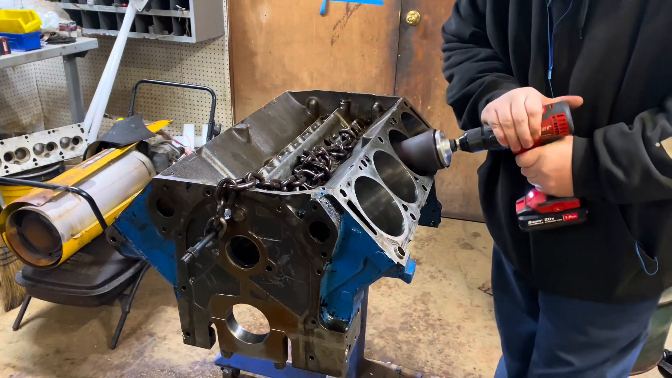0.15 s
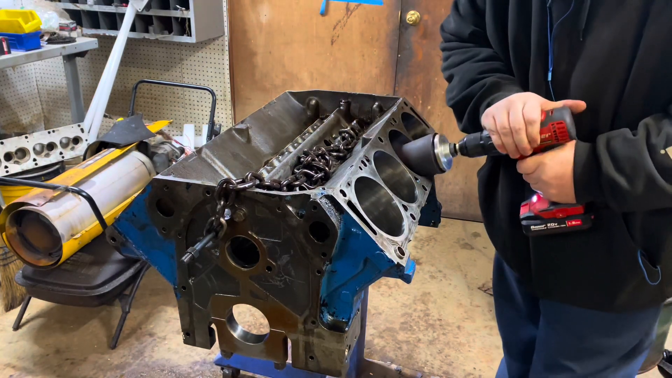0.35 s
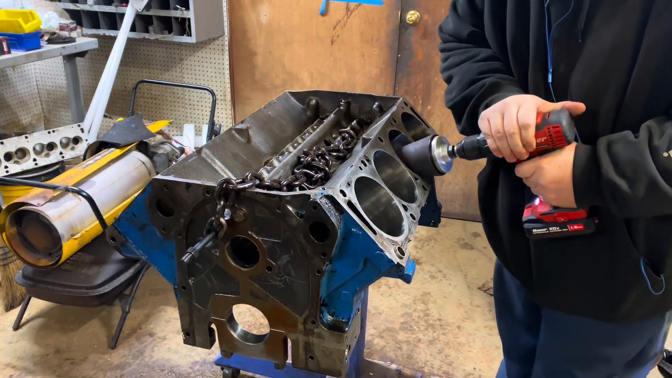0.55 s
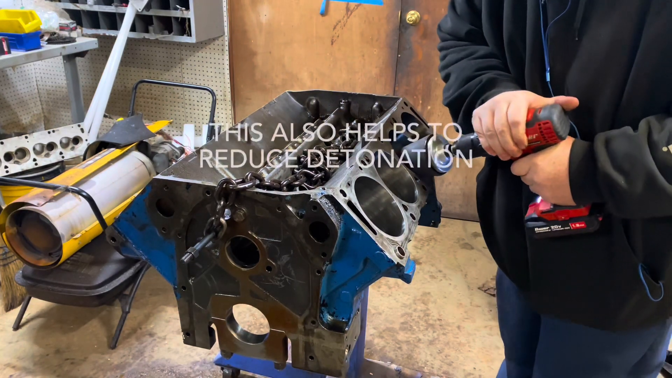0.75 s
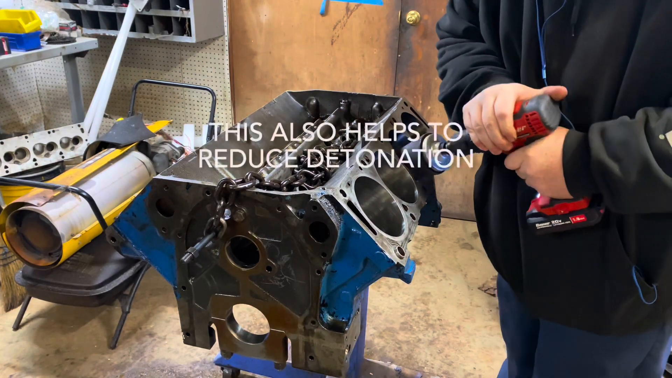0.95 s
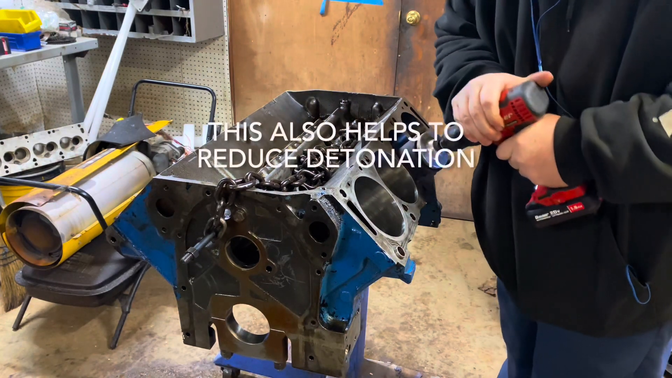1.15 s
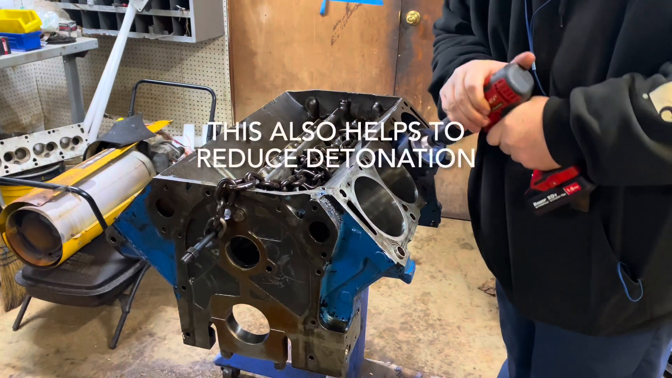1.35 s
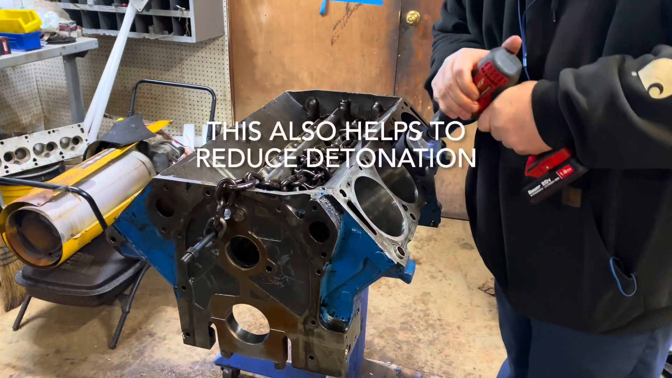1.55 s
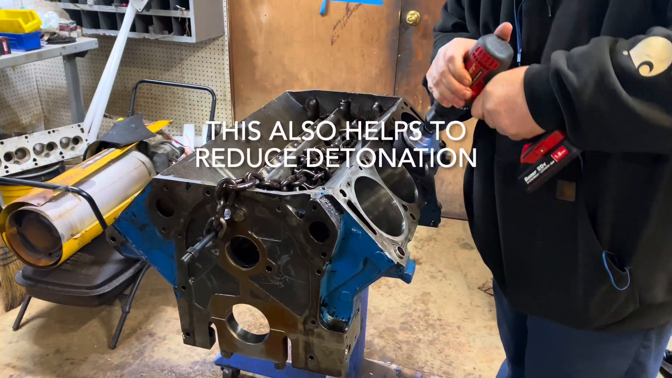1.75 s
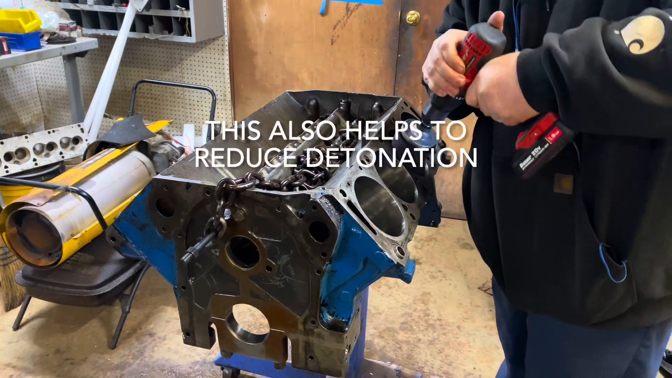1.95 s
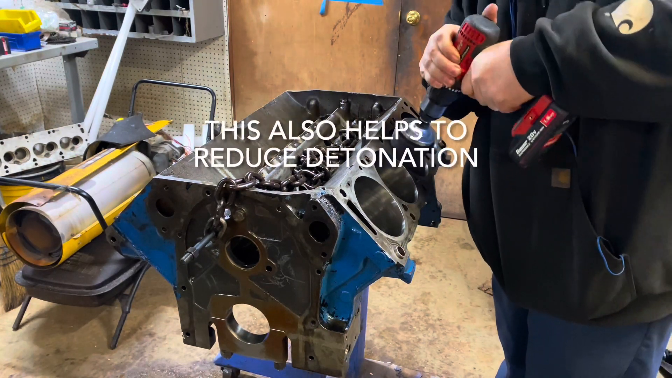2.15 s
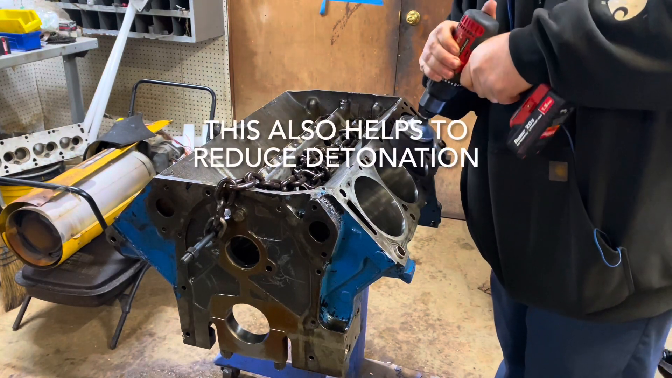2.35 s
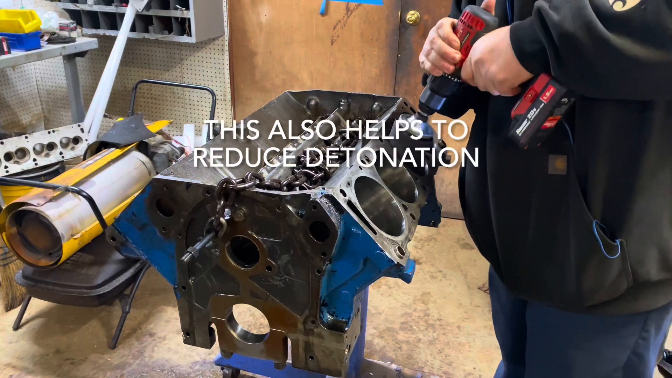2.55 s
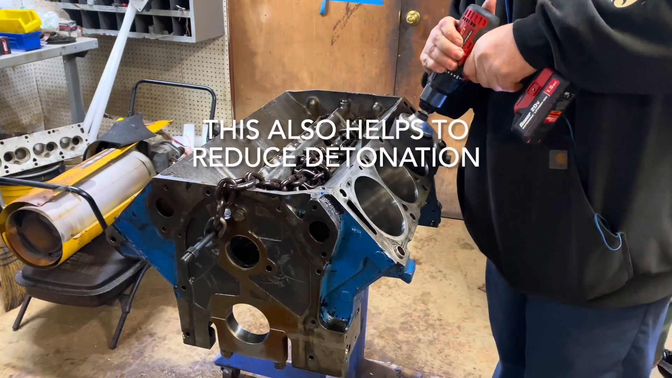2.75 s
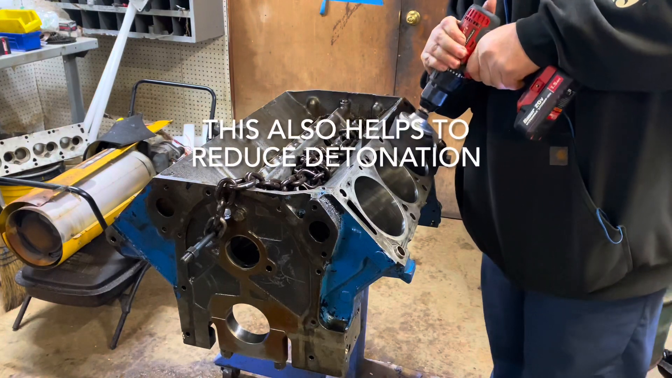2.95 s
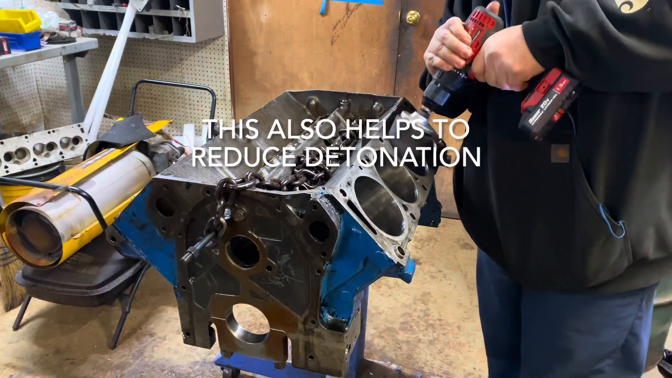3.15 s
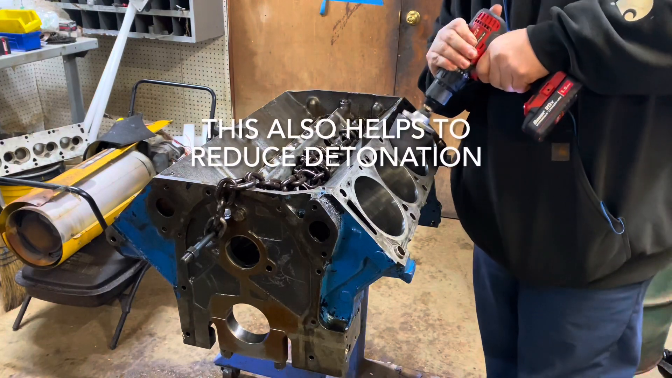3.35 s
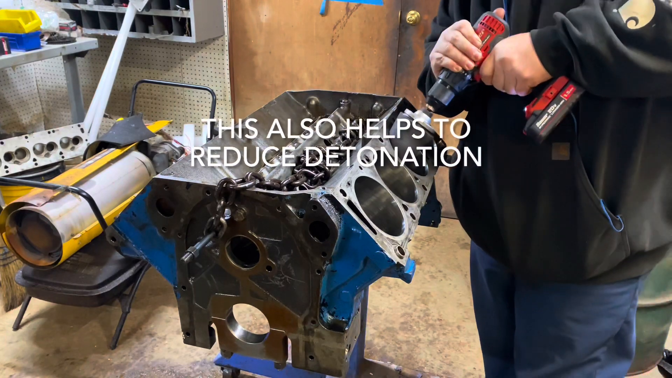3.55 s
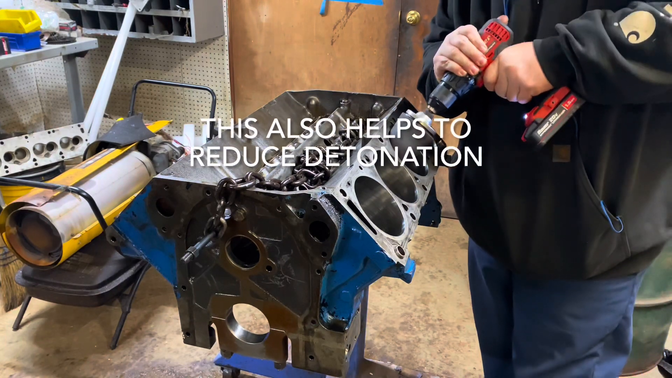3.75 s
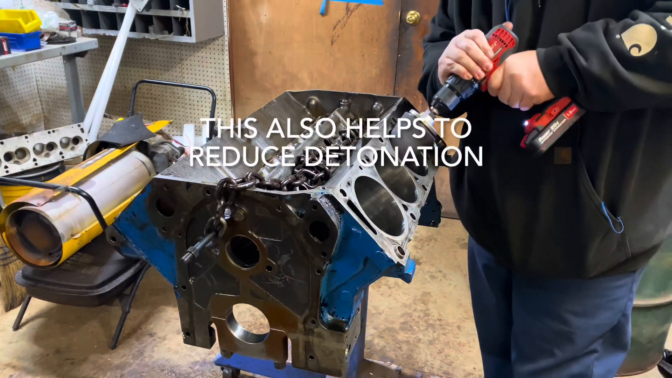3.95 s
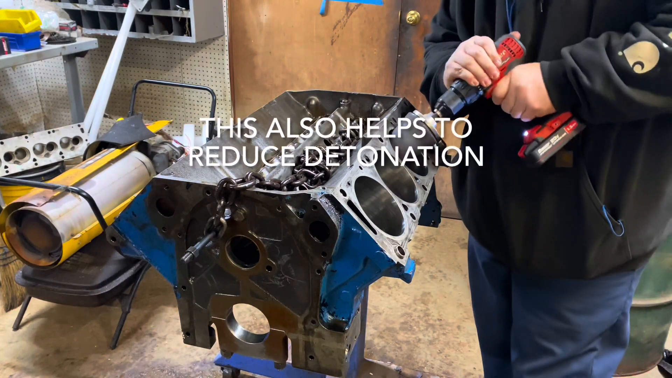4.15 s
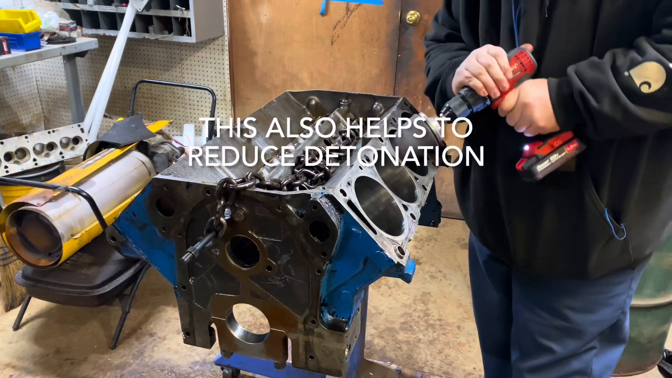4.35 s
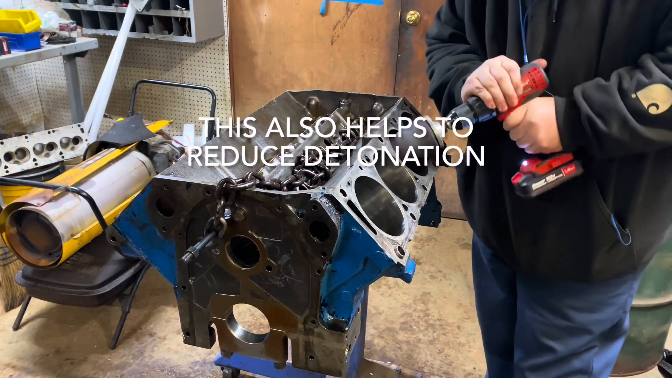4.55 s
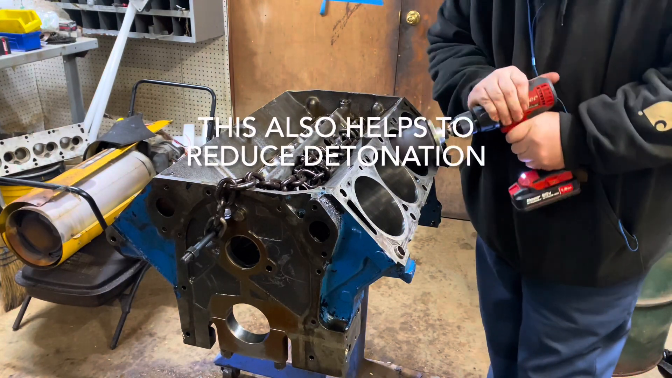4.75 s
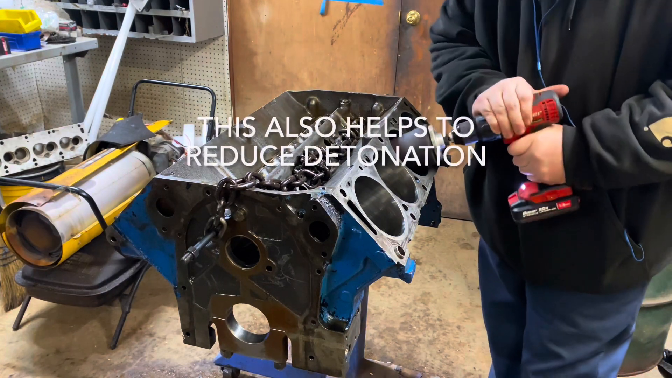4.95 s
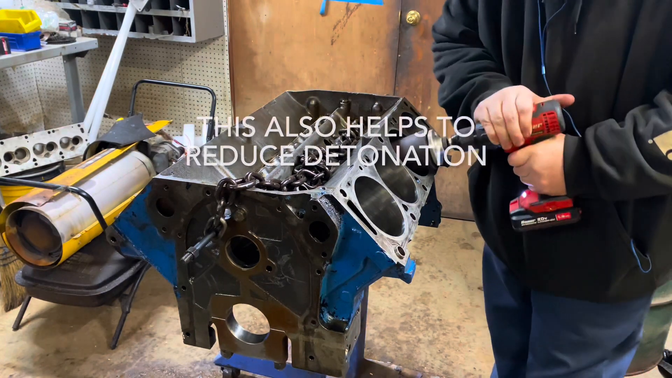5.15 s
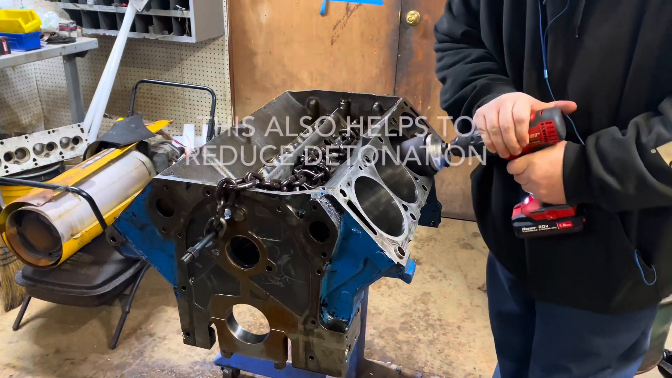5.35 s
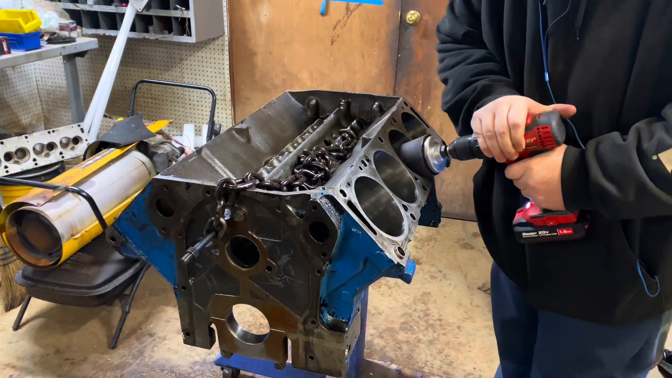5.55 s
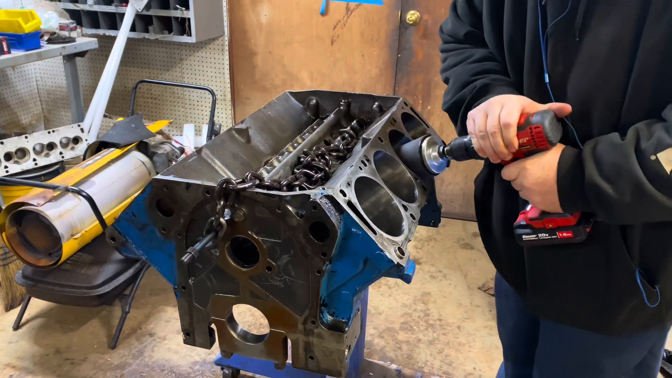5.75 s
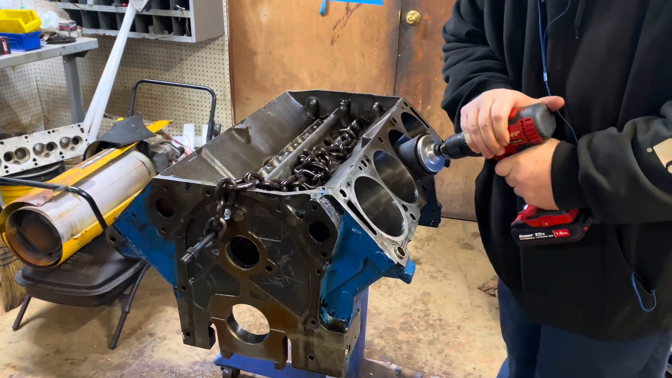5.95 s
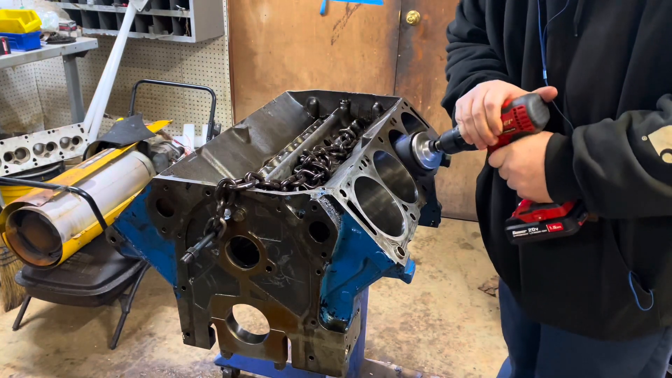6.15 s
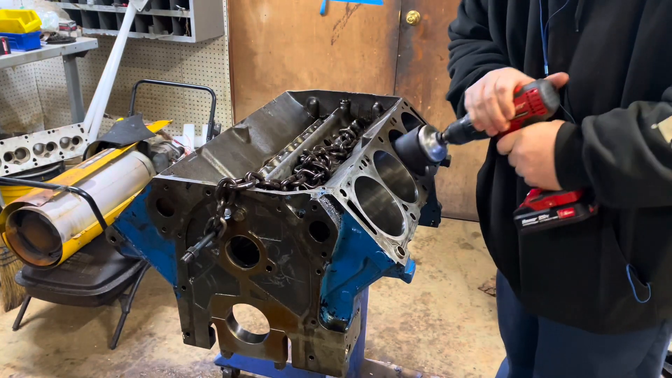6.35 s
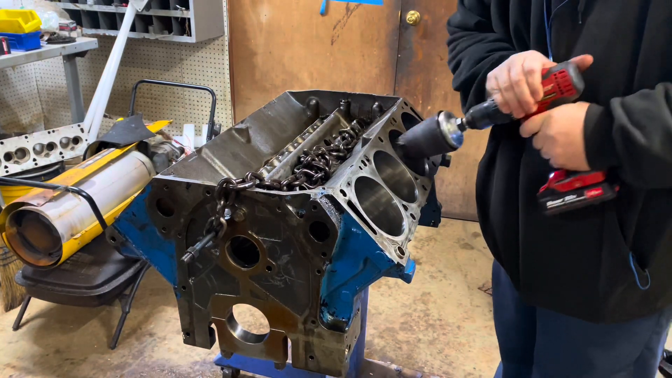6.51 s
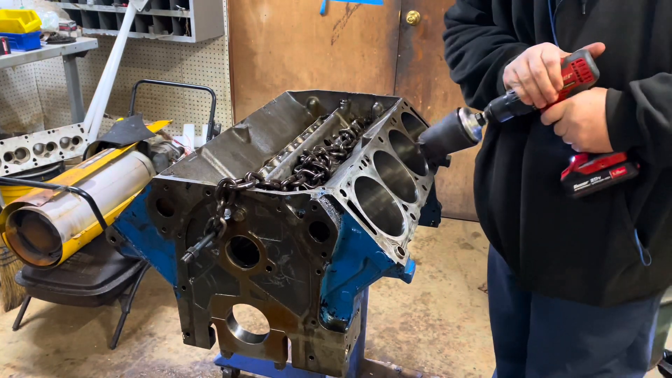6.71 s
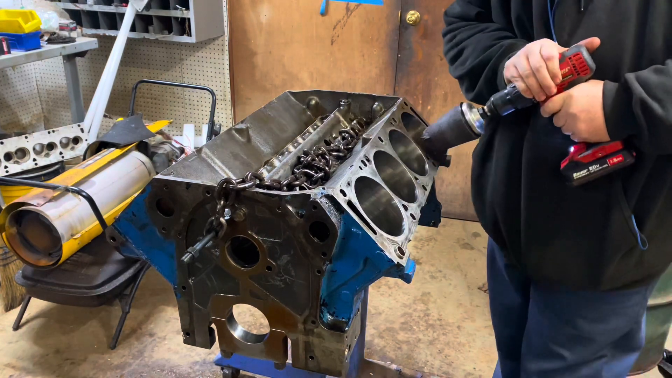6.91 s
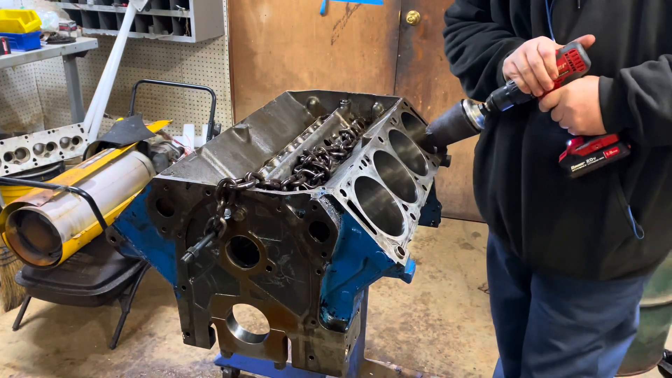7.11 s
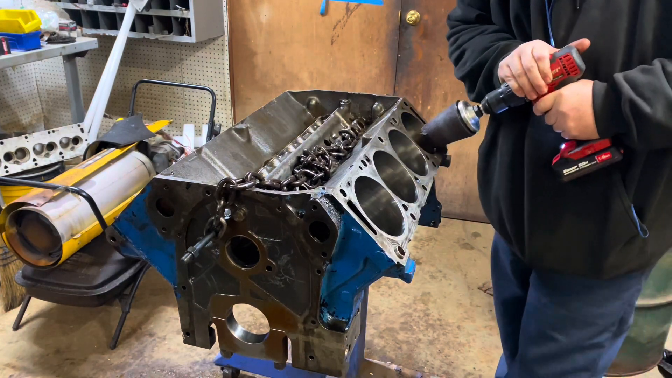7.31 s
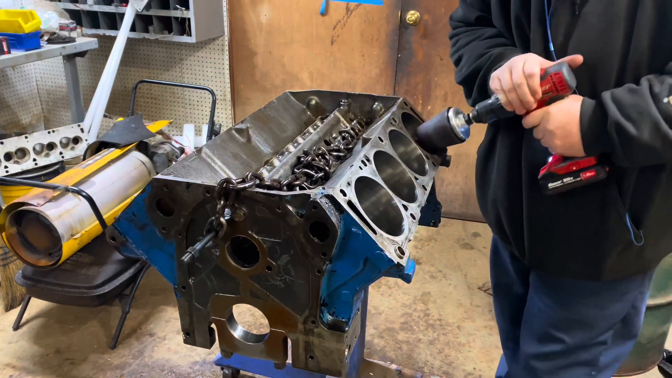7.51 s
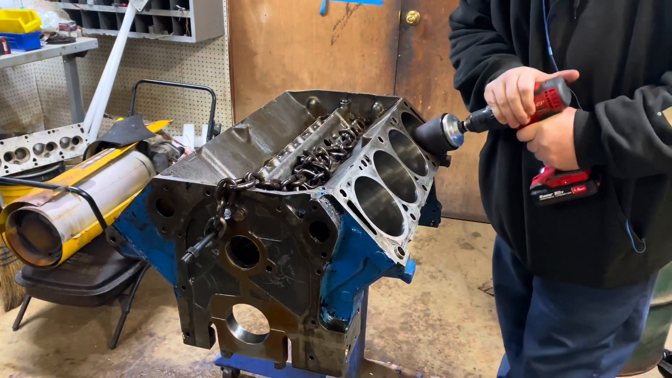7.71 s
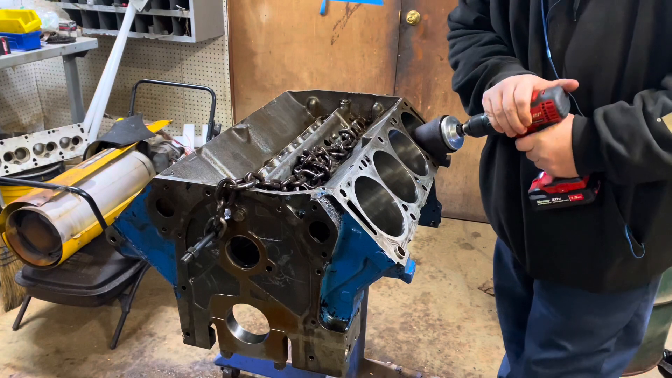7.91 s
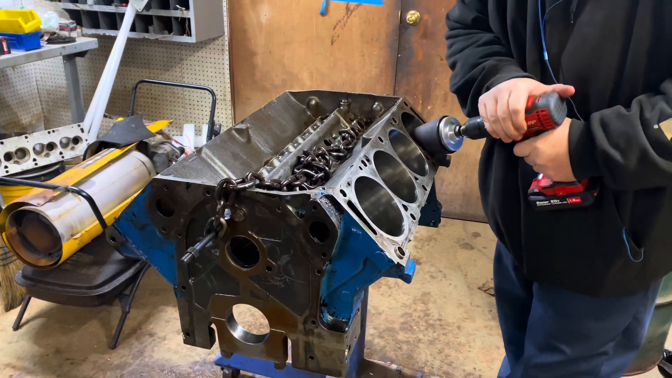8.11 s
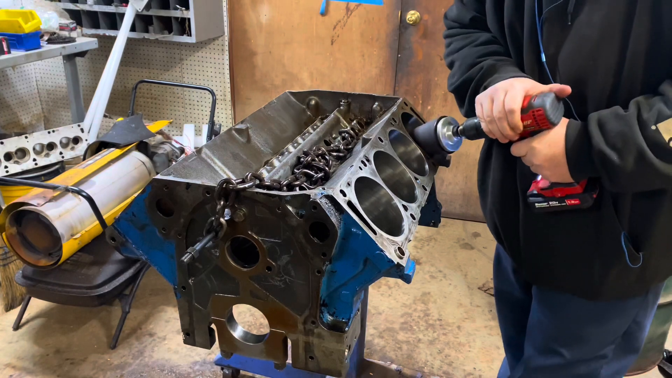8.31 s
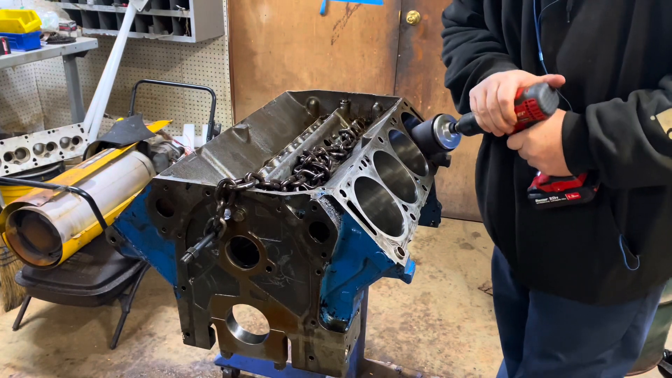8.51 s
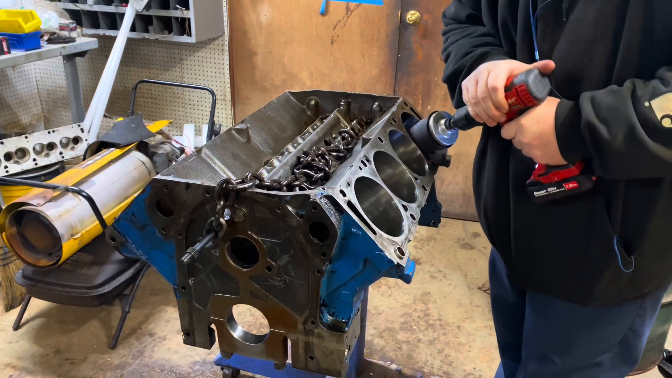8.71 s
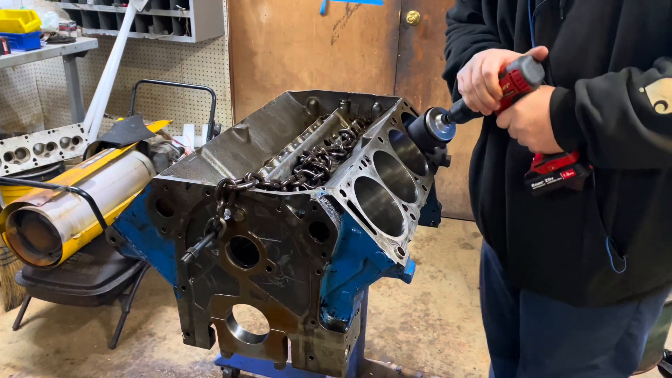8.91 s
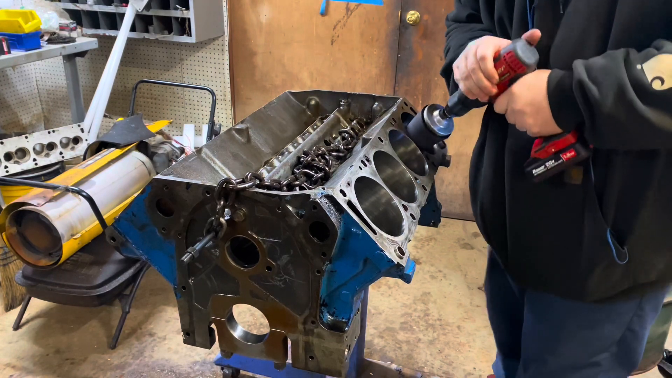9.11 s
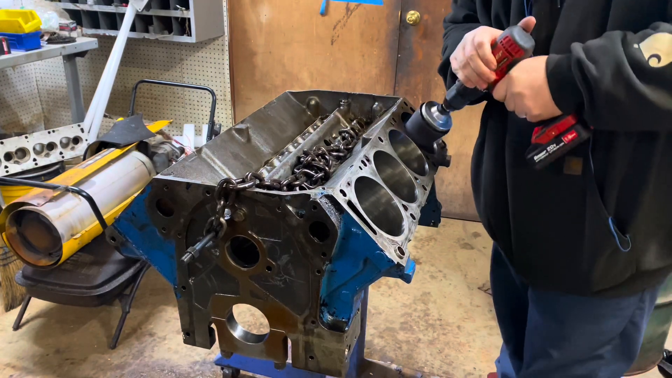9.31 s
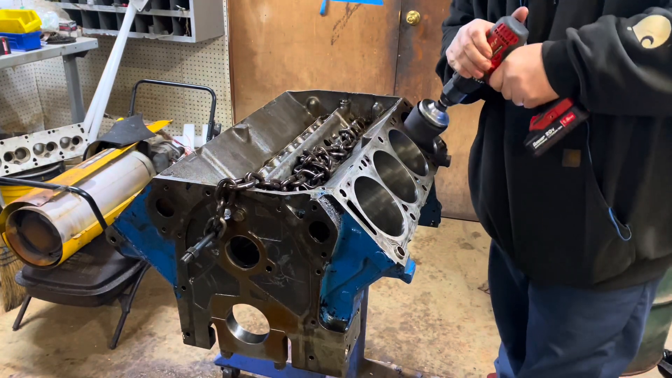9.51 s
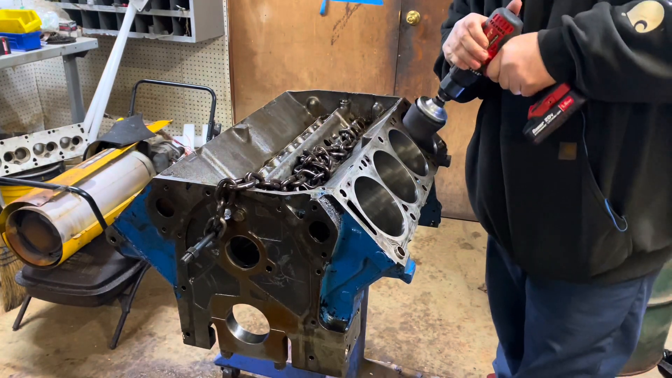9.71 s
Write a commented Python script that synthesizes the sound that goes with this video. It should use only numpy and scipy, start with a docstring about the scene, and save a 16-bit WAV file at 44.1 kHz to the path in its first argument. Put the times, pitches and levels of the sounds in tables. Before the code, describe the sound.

From 0 s a cordless drill is already running at full speed, close in a small workshop. A steady hum around 430 Hz lies under raspy, shifting gear tones, a dense bright mechanical rattle and a very high, thin whine near 7.7 kHz. From about 1 to 5 s the drill is swung up and back: the hum grows stronger while the whine dips, flutters and returns. At 6.25 s the trigger is released; the pitch drops fast and the motor brakes with a short, sharp chirp and clack at 6.3 s, with a brief room tail. Low shop rumble and faint air remain. Between 6.9 and 7.9 s come soft handling knocks, tiny plastic ticks and a rasping sleeve. Around 8 s a faint squeal and firm clack start the motor again, almost instantly at full speed, whirring through the end near 9.9 s, the hum rising as the whine fades.

```python
"""A cordless drill spins a cone-shaped cutter at the cylinder edges of an engine block, in a small workshop.
Its motor hums once a turn and whines at 18 times that; gear meshes add raspy tones and a noisy rattle.
The drill is swung up and back, which turns its tones toward or away from the listener.
It brakes with a chirp, is shifted in the hands with clacks, ticks and a brushing sleeve, and runs up again.
Slowly changing diffuse room tails surround it, over the rumble, hum and faint air of the shop."""
import sys
import numpy as np
from scipy import signal
from scipy.fft import rfft, irfft, next_fast_len
from scipy.io import wavfile
from scipy.ndimage import uniform_filter1d

SR = 44100
rng = np.random.default_rng(int(sys.argv[2]) if len(sys.argv) > 2 else 0)


def master_out(mix):
    """Clip the mix to full scale and print it as 16-bit PCM to the path in sys.argv[1]."""
    frames = np.transpose(np.atleast_2d(mix))
    ceiling = np.clip(frames, -1, 1)
    pcm = np.round(ceiling * 32767).astype(np.int16)
    wavfile.write(sys.argv[1], SR, pcm)


N = 435266
TIME = np.arange(N) / SR
BINS = np.fft.rfftfreq(N, 1 / SR)
WHINE_ORDER = 18  # whine cycles per turn of the shaft

# full speed sags a little as the drill is moved: (time [s], pitch of the whine [Hz])
FULL_SPEED = [(0, 7776), (.85, 7784), (1.4, 7747), (1.85, 7740), (2.0, 7721), (2.35, 7716), (3.1, 7732),
              (3.9, 7739), (4.45, 7717), (4.8, 7758), (5.35, 7765), (5.7, 7750), (6.0, 7725), (6.24, 7782),
              (8.3, 7758), (8.7, 7743), (9.45, 7755), (9.87, 7746)]


def gain_of(db):
    """The decibel law: 20 dB is a tenfold amplitude."""
    return 10 ** (np.asarray(db) / 20)


def evened(x):
    """Normalisation to unit mean power (rms 1)."""
    return x / np.sqrt(np.mean(abs(x) ** 2) + 1e-20)


def read(points, hz, column=1):
    """Interpolation of a spectrum table on a log-frequency axis."""
    table = np.array(points)
    return np.interp(np.log(hz + 1), np.log(table[:, 0] + 1), table[:, column])


def curve(rows, column=1):
    """Linear interpolation of a time table."""
    table = np.array(rows)
    return np.interp(TIME, table[:, 0], table[:, column])


def coloured(x, db):
    """Zero-phase linear filtering by a dB value for each bin; rms 1."""
    return evened(irfft(rfft(x) * gain_of(db), N))


def wander(hz):
    """Low-pass noise as slow chance variation, its spectral amplitude halved at hz; rms 1."""
    size = next_fast_len(N, True)
    low = np.fft.rfftfreq(size, 1 / SR)[:size // 16]
    spectrum = rng.standard_normal(len(low)) + 1j * rng.standard_normal(len(low))
    return evened(irfft(spectrum / (1 + (low / hz) ** 2), size)[:N])


def pair(likeness):
    """Partial coherence: white noise in two channels with a shared part."""
    common = rng.standard_normal(N)
    own = rng.standard_normal((2, N))
    likeness = np.clip(likeness, 0, 1)
    return np.sqrt(likeness) * common + np.sqrt(1 - likeness) * own


def resonances(rows, hz):
    """Superposed resonance peaks of Lorentzian shape, as a lift in dB."""
    return sum(db / (1 + (2 * (hz - centre) / width) ** 2) for centre, width, db in rows)


def motor(pulled, released):
    """Rotor inertia: share of full speed through a quick run-up, a short coast, then the brake."""
    spin_up_s = .043
    coast_per_s, brake_after_s, brake_per_s = 1.42, .087, 10  # shares of full speed lost per second
    run_up = 1 - np.exp(-np.maximum(TIME - pulled, 0) / spin_up_s)
    since = np.maximum(TIME - released, 0)
    slowed = coast_per_s * since + brake_per_s * np.maximum(since - brake_after_s, 0)
    return run_up * np.maximum(1 - slowed, 0)


def meshing(speed):
    """Contact threshold: the gears clatter only above a certain share of full speed."""
    rattle_from, rattle_power = 0.36, 0.44
    return np.clip((speed - rattle_from) / (1 - rattle_from), 0, 1) ** rattle_power


def housing_ring(x):
    """Modal resonance: the housing's low mode swells after the hum passes it and rings on."""
    peak_hz, width_hz, resonant_db = 398, 13, 7.5

    def response(hz):
        return 1 + gain_of(resonant_db) / (1 + 2j * (hz - peak_hz) / width_hz)

    full_speed_gain = abs(response(curve(FULL_SPEED).mean() / WHINE_ORDER))
    return irfft(rfft(x) * response(BINS), N) / full_speed_gain


def hum(turns, speed, tilt, wobble, waver=0.15, wobble_db=-63, second_power=4, tones_db=-2.6,
        fading_db=3.0, fading_hz=2.6, rasp_hz=70):
    """Periodic forcing: rotor unbalance hums purely; bearings and gear meshes add unsteady, raspy tones."""
    # the hum beams at the listener as the drill is swung up: (time [s], level before radiation [dB])
    hum_level = [(0, -39), (.3, -40.5), (.6, -38), (1.0, -33.5), (2, -34.5), (3.1, -34), (3.8, -34),
                 (4.2, -32), (4.6, -34), (5.0, -38), (5.4, -42), (6.2, -40.5), (8.08, -37.5), (8.16, -35),
                 (8.235, -38.5), (8.3, -39), (8.8, -38), (9.3, -36.5), (9.87, -32.5)]
    # the hum shifts between the ears as the drill moves: (time [s], phase lead of left [rad])
    hum_lead = [(0, -1.2), (.4, -.3), (.8, .05), (2, -.1), (3.3, -.5), (4.3, -1.2), (5, -1.3), (5.6, -.35),
                (6.2, -.1), (8.12, -.4), (8.24, -1.5), (8.4, -.7), (9.2, -.4), (9.87, -.6)]
    # second harmonic of the hum: (time [s], level at full speed [dB])
    second_level = [(0, -44.5), (.5, -41), (1, -50), (1.95, -55.5), (3.1, -51), (4, -47), (4.5, -56),
                    (5, -45.5), (5.6, -41), (6.1, -57), (8.3, -41.5), (9.87, -49)]
    # drone of the planet gears below the hum: (time [s], level at full speed [dB])
    drone_level = [(0, -59.5), (.5, -56), (1.1, -68.5), (2.9, -64), (3.3, -59.5), (3.9, -61), (4.2, -56),
                   (4.8, -56.5), (5.35, -55), (5.9, -63.5), (8.3, -57), (9.1, -60), (9.87, -64)]
    # gear tones at the 4th, 5th, 9th, 10th and 15th harmonics: (time [s], level before case lift [dB])
    fourth_level = [(0, -46), (.7, -55), (1.3, -45.5), (1.9, -56), (2.4, -50.5), (4, -51), (4.8, -45.5),
                    (5.5, -48), (6.2, -55), (8.2, -54), (8.5, -45), (8.85, -58), (9.25, -47), (9.87, -49)]
    fifth_level = [(0, -38), (.15, -37.5), (.78, -50.5), (1.1, -42), (1.65, -40), (2.1, -41), (2.8, -50),
                   (3.3, -44.5), (3.65, -40.5), (4.25, -48), (4.63, -39), (5.1, -41.5), (5.35, -46),
                   (5.65, -66), (5.95, -46), (6.2, -44), (8.14, -47), (8.22, -40), (8.35, -40),
                   (8.6, -48.5), (8.95, -40.5), (9.25, -38), (9.55, -43), (9.8, -41.5)]
    ninth_level = [(0, -42), (.45, -50), (1.12, -43.5), (1.6, -48), (2.7, -46), (3.7, -40), (4.3, -46),
                   (4.9, -51), (5.25, -63), (5.7, -39.5), (6.2, -53), (8.2, -49), (8.6, -39), (9, -49),
                   (9.87, -46)]
    tenth_level = [(0, -62), (.42, -49), (.53, -37.5), (.68, -39), (.8, -50), (.95, -40.5), (1.2, -39.5),
                   (1.5, -50.5), (1.8, -37), (2.06, -47), (2.25, -40), (2.7, -43), (3.35, -36.5),
                   (3.65, -40), (4.2, -38), (4.7, -43), (4.97, -59.5), (5.2, -44), (5.6, -47.5),
                   (6.2, -45.5), (8.15, -43), (8.6, -42.5), (8.8, -50), (9.1, -44.5), (9.87, -38)]
    fifteenth_level = [(0, -40), (.4, -41.5), (.8, -44), (1.3, -54), (3.9, -54), (4.5, -48), (4.95, -42.5),
                       (5.5, -44), (6.1, -57), (8.3, -49), (9.1, -59), (9.87, -47)]
    # raspy tone above the 6th harmonic, two tones between harmonics: (time [s], level before case lift [dB])
    rasp_level = [(0, -44), (.3, -43), (.8, -45.5), (1.05, -57), (1.4, -45), (1.8, -54), (2.5, -45),
                  (3.2, -52), (3.6, -46), (4.4, -56), (4.8, -50), (5.5, -44), (6.1, -53), (8.15, -46),
                  (8.45, -44), (8.9, -51), (9.4, -54), (9.8, -46)]
    low_gear_level = [(0, -49), (1.3, -47), (2, -49), (2.5, -46), (3.4, -56), (4.3, -58), (4.7, -46),
                      (5.6, -48), (6.2, -53), (8.2, -50), (8.5, -40), (9.1, -53), (9.87, -49)]
    high_gear_level = [(0, -58), (1.5, -53), (2, -45), (2.55, -47), (3.9, -49), (4.4, -42), (4.65, -44.5),
                       (5.3, -66), (5.8, -42), (6.25, -58.5), (8.1, -44.5), (8.17, -54), (8.3, -50),
                       (8.65, -45), (9.3, -50), (9.87, -43)]
    # strong gear tones: (multiple of the shaft rate [1], level curve, roughness [0-1])
    gear_tones = [
        (.668, drone_level, .3), (4, fourth_level, .15), (5, fifth_level, .12),
        (6.355, rasp_level, .6), (8.668, low_gear_level, .4), (9, ninth_level, .35),
        (10, tenth_level, .1), (10.68, high_gear_level, .5), (15, fifteenth_level, .5)]
    # case resonances swept as the speed changes: (multiple [1], centre [Hz], width [Hz], lift [dB])
    mesh_peaks = [(5, 1970, 55, 8), (10.68, 3980, 260, 12)]
    # weaker tones: (multiple of the shaft rate [1], relative level held level [dB], swung up [dB])
    weak_tones = [(3, -55, -56), (6, -58, -56), (7, -59, -57), (8.73, -53, -57), (10.63, -54, -54),
                  (11, -57, -57), (13, -55, -58), (16, -54, -53), (19, -50, -55), (20, -62, -56),
                  (25, -58, -59), (30, -56, -54), (36, -51, -54)]
    dead_hz, dead_width_hz = 358, 10  # antiresonance of the housing
    hum_from_hz = 270  # the housing is too small to radiate the hum below this pitch
    hum_power, tones_power = 0.2, 1.6  # growth with speed
    shaft_hz = speed * curve(FULL_SPEED) / WHINE_ORDER

    def tone(multiple, waver, rough=0, lead=0):
        unsteady = np.sqrt(1 - rough ** 2) + waver * (wander(14) + 1j * wander(8.6))
        if rough:
            unsteady = unsteady + rough * evened(wander(rasp_hz) + 1j * wander(rasp_hz))
        angle = 2 * np.pi * (multiple * turns + rng.random()) + lead
        return np.sqrt(2) * (unsteady * np.exp(1j * angle)).real

    def near(hz, width, multiple=1):
        return np.exp(-((multiple * shaft_hz - hz) / width) ** 2)

    def lift_db(multiple):
        return sum(db * near(hz, width, multiple) for k, hz, width, db in mesh_peaks if k == multiple)

    radiated = (1 - near(dead_hz, dead_width_hz)) / (1 + (hum_from_hz / (shaft_hz + 1)) ** 10)
    lead = np.outer([1, 0], curve(hum_lead))
    hum_gain = gain_of(curve(hum_level)) + gain_of(wobble_db) * wobble
    first = radiated * hum_gain * tone(1, waver=0.05, lead=lead)
    second = speed ** second_power * gain_of(curve(second_level)) * tone(2, waver=0.078)
    meshes = sum(gain_of(curve(level) + lift_db(multiple)) * tone(multiple, waver, rough)
                 for multiple, level, rough in gear_tones)
    # each weak tone swells and fades by chance on its own
    gears = sum(gain_of(level + tilt * (up - level) + fading_db * wander(fading_hz)) * tone(multiple, waver)
                for multiple, level, up in weak_tones)
    drive = meshing(speed)
    ringing = housing_ring(drive * speed ** hum_power * first)
    return ringing + drive * speed ** tones_power * (second + meshes + gain_of(tones_db) * gears)


def whine(turns, speed, tilt, wobble, wobble_depth=0.0096, flutter=0.068, swell_db=1.0,
          turned_swell_db=1.0, scatter_db=-43, whine_db=1.76):
    """Slot-passing tone: the motor's slots whistle; chuck wobble and scattered reflections add flutter."""
    # whine at full speed: (time [s], relative level [dB])
    whine_level = [(0, -26), (.32, -22.5), (.5, -20), (.8, -22.5), (1.0, -26), (1.42, -26.5), (1.62, -38.5),
                   (1.85, -31), (2.15, -28), (2.32, -40), (2.58, -28.5), (2.82, -36), (3.02, -49),
                   (3.2, -37), (3.42, -30), (3.75, -25.5), (4.15, -24.5), (4.5, -27.5), (4.8, -25.5),
                   (5.02, -28.5), (5.18, -21.5), (5.35, -24), (5.6, -19), (5.88, -25), (6.24, -24.5),
                   (8.22, -21), (8.33, -23), (8.48, -20.5), (8.92, -28), (9.2, -25), (9.87, -40)]
    whine_power = 8.5  # growth with speed
    swells = (swell_db + turned_swell_db * tilt) * wander(2.7)  # stronger when swung up
    fluttering = 1 + wobble_depth * wobble + flutter * wander(45)
    direct = gain_of(whine_db + curve(whine_level) + swells) * fluttering
    scattered = gain_of(scatter_db) * (wander(12.0) + 1j * wander(15.0))
    carrier = np.exp(2j * np.pi * WHINE_ORDER * turns)
    return np.sqrt(2) * speed ** whine_power * ((direct + scattered) * carrier).real


def rattle(turns, speed, tilt, wobble, throb=0.11, wobble_depth=0.022, grain_db=1.0, patchy_db=1.5):
    """Random impact excitation: countless tooth and bearing contacts, bunched once a turn, ring the housing."""
    # colour of the rattle: (frequency [Hz], relative level held level [dB], swung up [dB])
    housing_colour = [(162, -23.5, -24), (394, -10, -6.5), (570, -7.5, -6.5), (1116, -5, -4),
                      (1590, -6, -4.5), (1836, 4, 3.5), (2433, -1.5, 2), (4200, -1, 0), (5100, -5, 1.5),
                      (5900, 1.5, 0.5), (6480, 2, -1.5), (8300, 0.5, 2), (8470, -15.5, -11),
                      (11350, -4, -2), (15500, -15.5, -16)]
    # resonances of the gear case and cutter, and one dip: (centre [Hz], width [Hz], lift [dB])
    case_rings = [(550, 40, -1.5), (1167, 240, 3.5), (2010, 79, 1), (2795, 150, 1.5), (3860, 440, 3.5),
                  (4280, 470, 1.5), (6710, 210, 1.5)]
    # gear rattle held level, at full speed: (time [s], level [dB])
    rattle_level = [(0, -31.5), (.7, -30.5), (1.2, -31), (2.4, -31.5), (3.7, -30.6), (4.4, -32),
                    (5.4, -30.5), (6.2, -31.5), (8.07, -30.5), (8.2, -29.5), (8.5, -29), (9.1, -30.5),
                    (9.87, -31)]
    rattle_tilt_db = -2  # change when fully swung up
    turned_at = 0.64  # tilt from which the rattle has its swung-up colour
    contacts = pair(0.87) * gain_of(grain_db * wander(700)) * (1 + throb * np.cos(2 * np.pi * turns))
    # random patches of time and frequency make the rattle swell and fade unevenly
    z = signal.stft(contacts, nperseg=256)[2]
    patches = uniform_filter1d(rng.standard_normal(z.shape[1:]), size=3, axis=0)
    patches = evened(uniform_filter1d(patches, size=6, axis=1))
    contacts = signal.istft(z * gain_of(patchy_db * patches), nperseg=256)[1][:, :N]
    rings = resonances(case_rings, BINS)
    level = coloured(contacts, read(housing_colour, BINS, 1) + rings)
    up = coloured(contacts, read(housing_colour, BINS, 2) + rings)
    turned = np.minimum(tilt / turned_at, 1)
    driven = gain_of(curve(rattle_level) + rattle_tilt_db * tilt) * meshing(speed)
    return driven * (1 + wobble_depth * wobble) * (level + turned * (up - level))


def room(x, count=7, stay_s=0.601):
    """Diffuse reverberation: bands decay at their own rates; the reflections change slowly in a steady cycle."""
    # decay of the room: (frequency [Hz], t60 [s])
    decay = [(100, 0.86), (500, 0.37), (2000, 0.32), (7000, 0.34), (15000, 0.073)]
    out = np.zeros((2, N))
    for pattern in range(count):
        # the first 4 ms are silent
        taps = rng.standard_normal((2, SR // 2)) * (np.arange(SR // 2) / SR > .004)
        hz, t, z = signal.stft(taps, SR, nperseg=256)
        tail = signal.istft(z * gain_of(-60 * t / read(decay, hz)[:, None]), SR, nperseg=256)[1]
        # successive patterns crossfade at equal power
        away = abs((TIME / stay_s - pattern + count / 2) % count - count / 2)
        share = np.cos(np.pi / 2 * np.minimum(away, 1))
        out += signal.fftconvolve(share * x, tail / np.linalg.norm(tail[0]), axes=1)[:, :N]
    return out


def shop(rumble_db=-1.0, air_db=-71, waver=.5, surge_db=2.0):
    """Ambient noise split by a crossover: low rumble and machine hum come and go, under faint steady air."""
    # background spectrum before the crossover: (frequency [Hz], relative density [dB per Hz])
    background = [(12, -66), (28, -39), (52, -11), (73, -9), (88, -13), (104, -12.5), (130, -24.5),
                  (200, -19), (240, -24.5), (330, -29.5), (700, -30), (3000, -42.5), (15000, -71)]
    # low rumble: (time [s], relative level [dB])
    rumble_level = [(.6, -60), (.85, -66), (2.6, -66), (5.4, -64), (5.9, -63), (6.6, -69), (7.2, -57.5),
                    (8.5, -61.5), (9.3, -60), (9.87, -63)]
    machine_hz, machine_db = 72, -5  # low machine hum, level relative to the rumble
    low = 1 / (1 + (BINS / 170) ** 4)
    rumble = coloured(pair(1.0), read(background, BINS) + 20 * np.log10(low))
    unsteady = 1 + waver * (wander(3) + 1j * wander(3))
    machine = evened((unsteady * np.exp(2j * np.pi * machine_hz * TIME)).real)
    air = coloured(pair(0.65), read(background, BINS) + 20 * np.log10(1 - low + 1e-9))
    surging = gain_of(rumble_db + curve(rumble_level) + surge_db * wander(7))
    return surging * (rumble + gain_of(machine_db) * machine) + gain_of(air_db) * air


def chirps(overtone_db=-4, rough=0.042):
    """Frequency glide: the windings squeal, rough and falling, with one overtone, at braking or starting."""
    # squeals: (start [s], length [s], start pitch [Hz], end pitch [Hz], fundamental amplitude [dB])
    squeals = [(6.324, 0.0115, 4130, 3200, -26), (7.988, 0.059, 3650, 3100, -56)]
    out = np.zeros(N)
    unsteady = 1 + rough * wander(610)
    for s, length, start_hz, end_hz, db in squeals:
        u = np.clip((TIME - s) / length, 0, 1)
        angle = 2 * np.pi * np.cumsum(unsteady * start_hz * (end_hz / start_hz) ** u) / SR
        swell = np.sqrt(abs(np.sin(np.pi * u)))
        out += gain_of(db) * swell * sum(gain_of(overtone_db * k) * np.sin((k + 1) * angle) for k in range(2))
    return out


def clacks(attack_s=0.0015, grain_db=3):
    """Impact response: loose parts knock in grainy bursts, each with its own colour, and ring the shell."""
    # drive train, trigger and grip, broad or narrow in colour:
    # (time [s], level before attack and decay [dB], t60 [s], centre [Hz], width [octaves])
    knocks = [(6.326, -30.5, 0.14, 4150, 2.8), (6.325, -26, 0.052, 6800, .3), (6.914, -66, 0.45, 696, 1.6),
              (7.090, -57.5, 0.2, 2840, 0.62), (7.092, -68, 0.13, 6300, .25), (7.116, -60, 0.27, 1900, 1.3),
              (7.268, -55, 0.14, 1000, 1.5), (7.269, -58, 0.16, 400, 0.74), (7.286, -56, 0.13, 1550, 0.5),
              (7.288, -70, .25, 4600, .4), (7.326, -64, 0.26, 1900, .5), (7.512, -60, 0.077, 1200, 3.1),
              (7.512, -59, .05, 5300, 0.2), (7.556, -58, 0.16, 600, 1.1), (7.585, -62, 0.3, 328, 0.39),
              (7.84, -64, 0.15, 1490, 1.7), (7.946, -48, 0.02, 4200, 1.2), (7.951, -47, 0.013, 4200, 1.1),
              (8.012, -57, .3, 3500, 1.3), (8.029, -45.5, 0.22, 2600, 1.4), (8.040, -34, 0.074, 4000, 5.3),
              (8.040, -36, .06, 7660, 0.08)]
    # modes of the drill's shell: (centre [Hz], width [Hz], lift [dB])
    shell_modes = [(1040, 60, 9), (1270, 60, 2.5), (1800, 130, 4), (2250, 90, -5), (3100, 160, 2),
                   (4250, 200, -1), (6100, 180, 3)]
    out = np.zeros((2, N))
    t = np.arange(SR // 2) / SR
    hz = np.fft.rfftfreq(len(t), 1 / SR) + 1
    noise = pair(0.7) * gain_of(grain_db * wander(400))
    rise = 1 - np.exp(-t / attack_s)
    shell = gain_of(resonances(shell_modes, hz))
    for s, db, t60, centre_hz, octaves in knocks:
        span = slice(round(s * SR), round(s * SR) + len(t))
        band = 1 / (1 + (np.log2(hz / centre_hz) / octaves) ** 2)
        body = band / np.sqrt(1 + hz / centre_hz) * shell
        burst = evened(irfft(rfft(noise[:, span]) * body, len(t)))
        out[:, span] += burst * rise * gain_of(db - 60 * t / t60)
    return out


def sleeve():
    """Friction noise: cloth rasps unevenly over the drill's body."""
    # brushing of the sleeve: (time [s], level [dB])
    brush_level = [(7.5, -95), (7.53, -61), (7.6, -62), (7.66, -65), (7.72, -73), (7.8, -73), (7.88, -71),
                   (8.0, -71), (8.1, -97)]
    # colour of the cloth: (frequency [Hz], relative density [dB per Hz])
    cloth_colour = [(100, -11), (300, 9.5), (600, -4.5), (1500, -8), (4000, -18), (5200, -8), (6500, -22),
                    (15000, -26.5)]
    rasping = pair(.8) * gain_of(3.5 * wander(58.5))
    return gain_of(curve(brush_level)) * coloured(rasping, read(cloth_colour, BINS))


def ticks():
    """Transient wavelets: small plastic parts of the shell snap, one short wavelet each."""
    # snaps: (time [s], peak level [dB], centre [Hz], length [s])
    snaps = [(7.595, -49, 7500, .00006), (7.6745, -45.5, 3000, .00019), (7.68, -54, 3200, .0002),
             (7.683, -45, 3000, 0.0002)]
    out = np.zeros(N)
    for s, db, hz, length in snaps:
        t = TIME - s
        out += gain_of(db) * np.exp(-(t / length) ** 2) * np.cos(2 * np.pi * hz * t)
    return out


def scene(jitter=0.00057, gear_ratio=28, noise_room_db=-7, hum_room_db=-30, whine_room_db=-26):
    """Common rotation: one shaft drives every motor and gear layer; the chuck turns far slower and wobbles."""
    # pulls of the trigger: (pulled [s], released [s])
    pulls = [(-1, 6.24), (8.02, 11)]
    # how far the drill is swung up: (time [s], tilt [0-1])
    swing = [(0, 0.1), (.35, 0), (.75, 0), (1, 0.46), (1.6, 0.54), (2.1, 0.8), (2.8, 0.97), (3.5, 0.53),
             (4.15, 0.7), (4.6, 0.2), (5, 0.24), (5.45, 0.07), (6.2, 0.28), (8.4, 0.24), (9.2, 0.55),
             (9.87, 0.8)]
    speed = sum(motor(*pull) for pull in pulls)
    shaft_hz = speed * curve(FULL_SPEED) / WHINE_ORDER * (1 + jitter * wander(24.8))
    turns = np.cumsum(shaft_hz) / SR
    tilt = np.clip(curve(swing), 0, 1)
    wobble = np.sqrt(2) * np.sin(2 * np.pi * turns / gear_ratio + wander(3.1))
    humming = hum(turns, speed, tilt, wobble)
    whining = whine(turns, speed, tilt, wobble) + chirps()
    noises = rattle(turns, speed, tilt, wobble) + clacks() + sleeve() + ticks()
    sent = gain_of(noise_room_db) * noises + gain_of(hum_room_db) * humming
    sent = sent + gain_of(whine_room_db) * whining
    return humming + whining + noises + room(sent) + shop()


def record(dry):
    """Interchannel phase and level: the two channels differ in both; then the band limit."""
    # phase between the channels: (frequency [Hz], lead of left [rad])
    channel_phase = [(0, 0), (700, -.1), (4500, -.25), (5800, -3), (6400, -5.9), (7450, -6.5), (7650, -7.4),
                     (7900, -7.6), (8500, -9.3), (9550, -9.5), (10400, -12.57), (11700, -12.57),
                     (12700, -15.6), (13600, -15.7), (14600, -18.85)]
    # the hum is weak in the left channel: (frequency [Hz], left minus right [dB])
    channel_balance = [(280, .8), (405, 0), (424, -6.5), (440, -6.5), (490, 0), (850, 1.5), (1100, -.5),
                       (3000, 2), (5400, 3.3), (7000, 1.2), (7750, 1.6), (9000, -.3)]
    edge_hz = 15800
    lead = np.interp(BINS, *np.transpose(channel_phase))
    balance_db = read(channel_balance, BINS)
    channels = np.array([gain_of(balance_db / 2), gain_of(-balance_db / 2) * np.exp(-1j * lead)])
    heard = irfft(rfft(dry) * channels, N)
    low_pass = signal.firwin(511, edge_hz, window=("kaiser", 9), fs=SR)
    return signal.oaconvolve(heard, low_pass[None], "same")


dry = scene()
out = record(dry)
master_out(out)
```